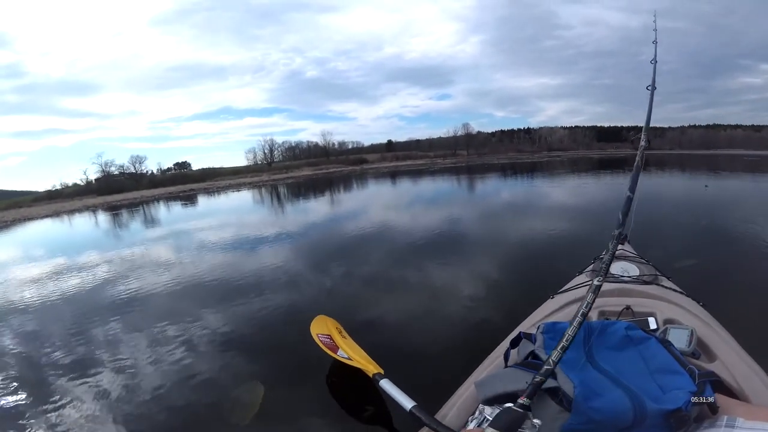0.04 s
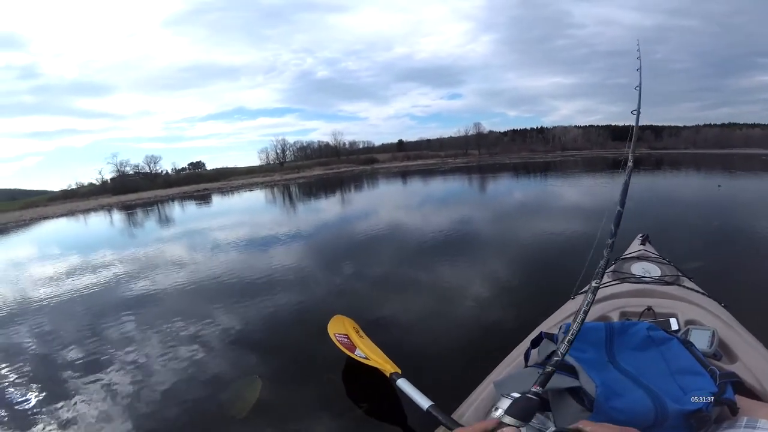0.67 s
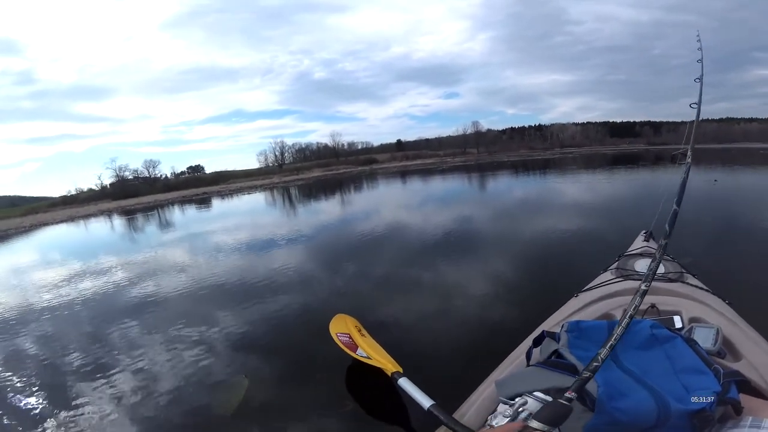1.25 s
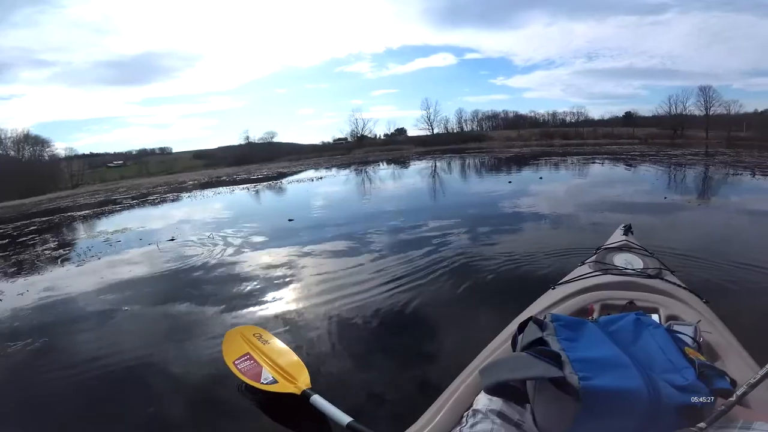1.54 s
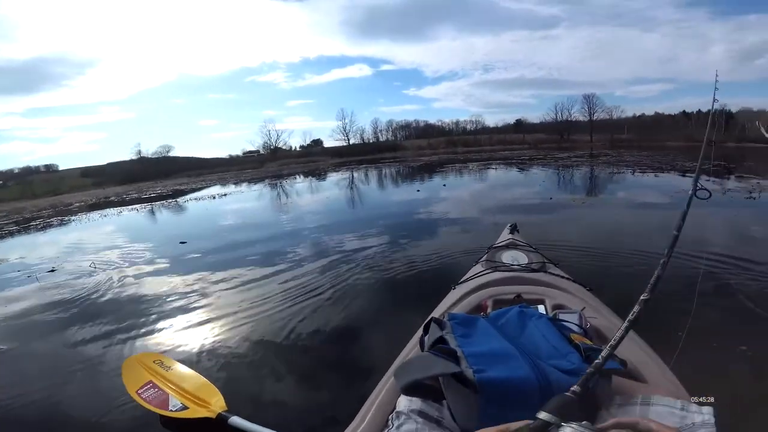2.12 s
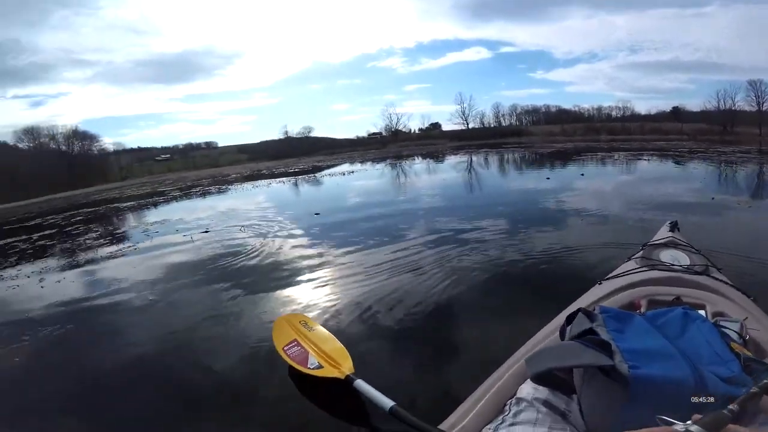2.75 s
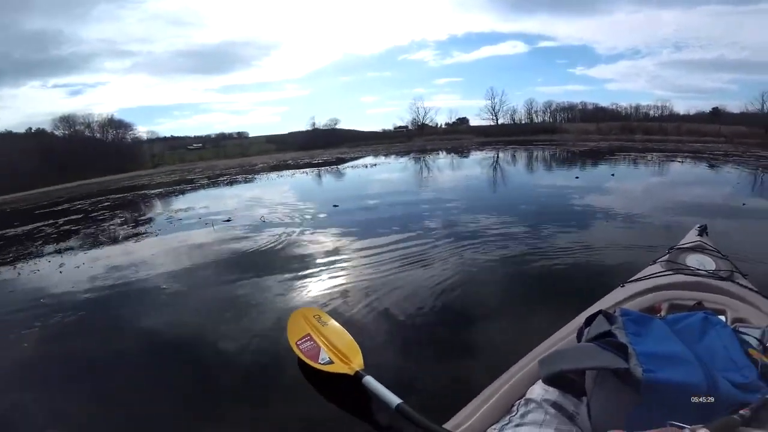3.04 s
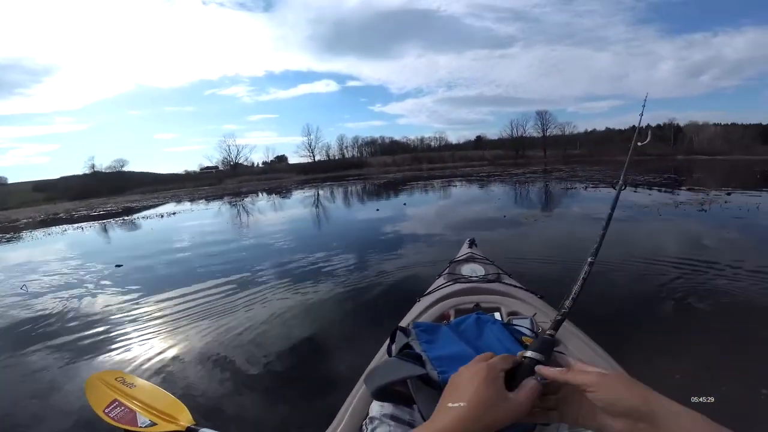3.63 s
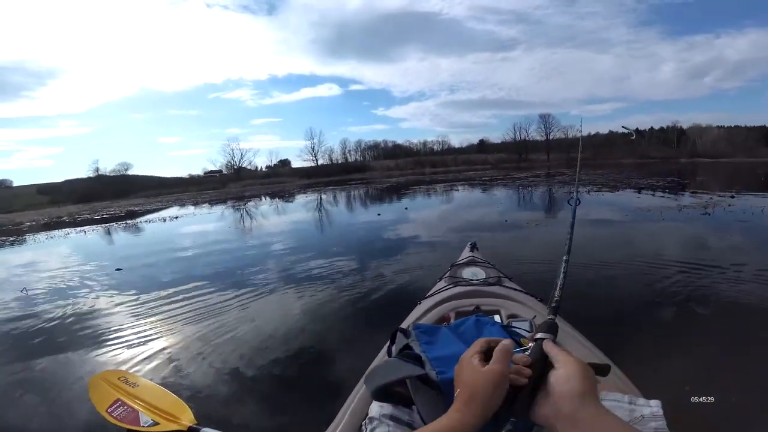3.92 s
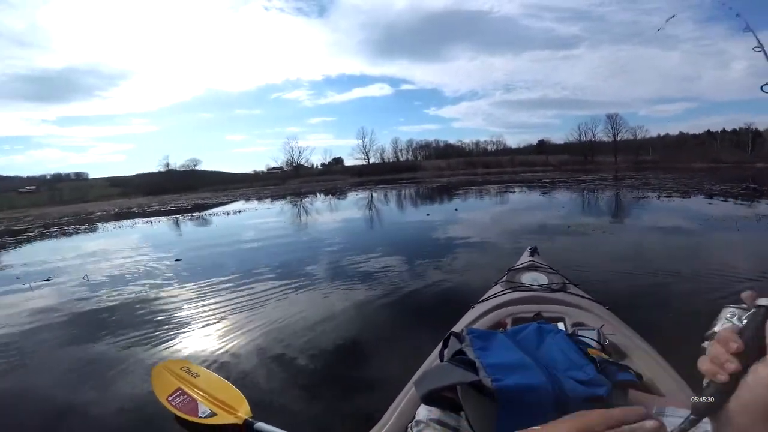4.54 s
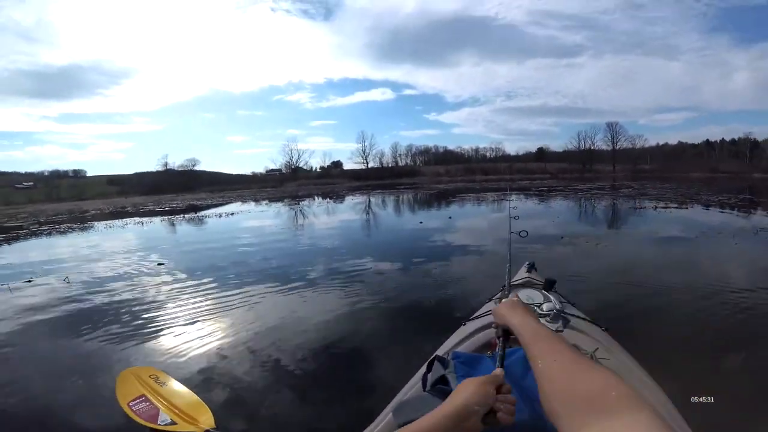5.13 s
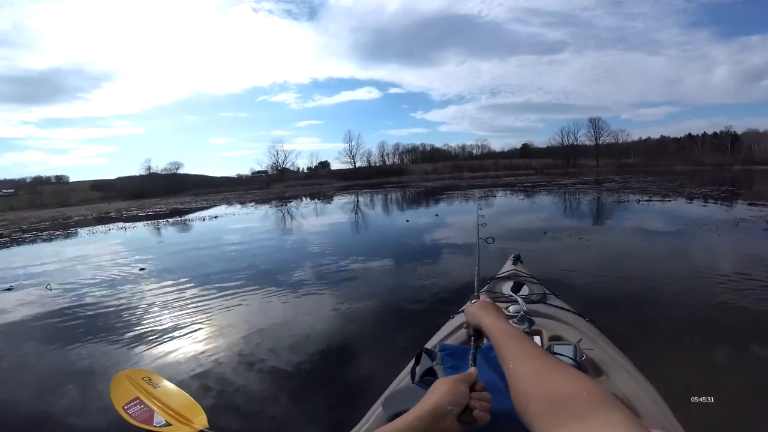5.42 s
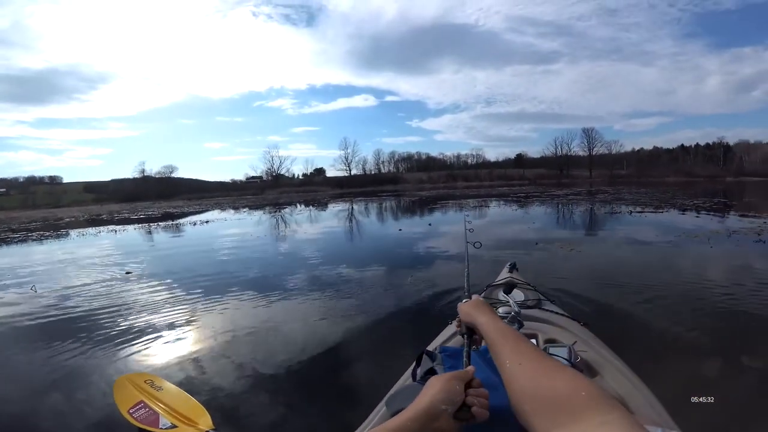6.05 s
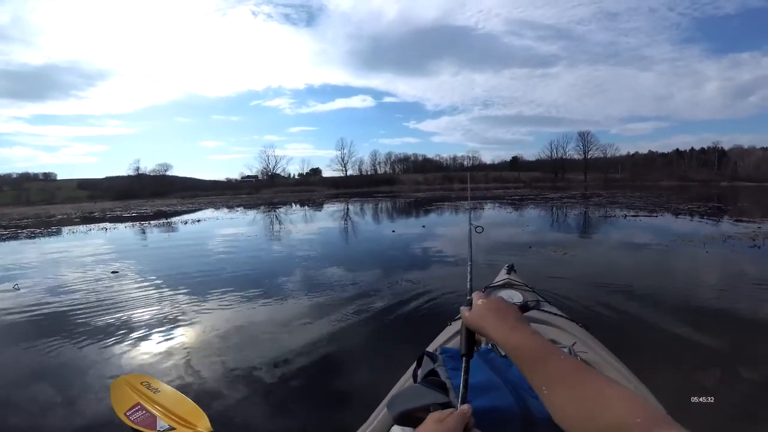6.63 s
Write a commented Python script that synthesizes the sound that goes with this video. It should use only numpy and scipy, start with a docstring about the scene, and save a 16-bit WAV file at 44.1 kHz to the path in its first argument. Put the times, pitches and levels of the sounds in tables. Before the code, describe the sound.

A shrill outdoor frog chorus continues behind nearby fishing reel clicks and the swish of a cast, which brings one loud, sharp knock.

```python
"""Spring peepers call from the shore of a still pond, each peep a short rising whistle, with birds far off.
Heard in stereo from a drifting kayak, on a camera worn by an angler. At arm's length a reel ratchets,
its bail snaps open, the rod swishes and line hisses off the spool; the cast brings one hard knock.
Right at the microphones are cloth rubbing on the housing, moving air, hiss and a faint pulsing whine."""
import sys
import numpy as np
from scipy import signal
from scipy.fft import rfft, irfft
from scipy.io import wavfile

SR = 44100
rng = np.random.default_rng(int(sys.argv[2]) if len(sys.argv) > 2 else 0)


def wav_record(signal):
    """Record a signal, one row per channel, as 16-bit PCM in the file named by sys.argv[1]."""
    frames = np.transpose(np.atleast_2d(signal))
    bounded = np.clip(frames, -1, 1)
    # unit amplitude maps onto the largest positive 16-bit level
    quanta = np.round(bounded * 32767).astype(np.int16)
    wavfile.write(sys.argv[1], SR, quanta)


N = 303408
TIME = np.arange(N) / SR

# The nearest frogs. Each name: start pitch in Hz, rise in Hz, length in seconds, left over right in dB.
FROG_VOICES = {"lead": (2805, 315, .115, 0), "quick": (2760, 195, .08, -3), "left": (2765, 315, .115, 8),
               "right": (2680, 250, .115, -8), "low": (2560, 185, .095, -8), "deep": (2425, 270, .13, -7),
               "shrill": (2930, 250, .08, 1), "high": (3070, 270, .08, 1), "far": (2450, 185, .085, 4)}
# Their clearest peeps. Each row: start in seconds, frog, relative level in dB.
NEAR_PEEPS = [(.005, "shrill", -62.5), (.035, "low", -63.5), (.08, "far", -66), (.14, "low", -61),
              (.286, "far", -57), (.585, "lead", -59), (.615, "far", -57.5), (.635, "low", -58),
              (1.04, "far", -61), (1.06, "lead", -62), (1.58, "low", -51.5), (1.745, "quick", -50.5),
              (1.749, "shrill", -49.5), (1.92, "right", -53), (1.924, "left", -56), (2.17, "left", -58),
              (2.316, "lead", -51), (2.331, "shrill", -54), (2.365, "deep", -53), (2.491, "right", -51),
              (2.598, "left", -57.5), (2.773, "lead", -48), (2.78, "shrill", -47.5), (2.905, "lead", -50.5),
              (3.055, "right", -57), (3.125, "lead", -51.5), (3.146, "deep", -54), (3.275, "shrill", -53),
              (3.42, "shrill", -53), (3.512, "lead", -55.5), (3.676, "right", -55), (3.87, "deep", -53.5),
              (3.912, "right", -59), (4.122, "shrill", -50), (4.255, "right", -51), (4.598, "lead", -49),
              (4.77, "right", -52), (5.009, "low", -51.5), (5.108, "lead", -49), (5.415, "lead", -46.5),
              (5.575, "right", -50), (5.72, "deep", -54.5), (5.845, "shrill", -51.5), (5.95, "lead", -46),
              (6.114, "right", -49), (6.12, "low", -47), (6.168, "quick", -46), (6.335, "low", -51),
              (6.355, "deep", -58.5), (6.463, "lead", -44.5), (6.469, "low", -48.5), (6.796, "low", -49),
              (6.815, "quick", -45)]
# Frogs that keep a beat. Each row: first peep and period in seconds, frog, relative level in dB.
STEADY_CALLERS = [(1.655, .49, "high", -60), (2.11, .496, "low", -54)]
# Rival frogs' trills. Each row: start and length in seconds, start and end pitch in Hz, level in dB.
RIVAL_TRILLS = [(0.423, 0.12, 2500, 2610, -64.5), (0.688, 0.21, 2970, 3130, -62.5),
                (0.984, 0.2, 3010, 3130, -66), (1.1, 0.4, 2470, 2600, -63)]
# Frogs further along the shore; the level jumps up at 1.5 s. Each row: time in seconds, level in dB.
CHORUS_LEVEL = [(0, -67), (.6, -66), (.95, -69.5), (1.25, -65), (1.493, -69), (1.5, -53), (1.95, -55),
                (2.6, -53.5), (3.45, -53), (4.05, -54.5), (4.35, -52.5), (5.4, -53.5), (5.65, -52.5),
                (5.95, -56.5), (6.2, -54.5), (6.88, -54.5)]
# Distant birds. Each row: start and length in seconds, pitch and arch height in Hz, level in dB.
BIRD_NOTES = [(.1, .07, 2000, 10, -71), (0.212, 0.066, 3380, 21, -68.5), (.3, 0.08, 2130, 9.2, -69.5),
              (3.006, 0.1, 3340, 160, -57.5), (3.725, 0.075, 2030, 40, -62), (3.84, 0.12, 3420, 31, -63),
              (3.942, 0.067, 2000, 82, -63)]

# Metal contacts in the reel. Each row: start in seconds, relative level in dB.
RATCHET_CLICKS = [(1.5025, -35), (1.5115, -37), (1.5205, -38), (1.5285, -36.5), (1.538, -37.5),
                  (1.5465, -35), (1.5595, -37), (1.5695, -38), (1.5803, -38.5), (1.5933, -36),
                  (1.614, -36.5), (1.637, -37), (1.6645, -39.5), (1.7038, -38)]  # slowing down
BAIL_CLICKS = [(2.5, -52.5), (3.15, -51), (3.435, -48), (4.2573, -47), (4.2627, -26.5), (4.2645, -34),
               (4.268, -34), (4.2705, -35), (4.273, -34), (4.648, -44)]  # small ticks and the snap
# Blows carried to the camera housing. Each row: start in seconds, strength in dB, contact in seconds.
HOUSING_BLOWS = [(3.048, -20.5, 0.0032), (3.138, -43.5, 0.0006), (4.357, -42, 0.0014), (4.855, 0, 0.00078),
                 (4.894, -29, 0.00058), (5.018, -39, 0.00052), (6.694, -54, 0.00087)]
# Resonances. Each row: pitch in Hz, relative level in dB, seconds to fall 60 dB, left over right in dB.
SPOOL_MODES = [(3670, -13, 0.021, -11), (3860, -9, 0.01, -12), (4340, -21.5, 0.35, -20),
               (4810, -13, 0.031, 1), (5240, -7, 0.0085, -7), (6293, -27.5, 0.11, -2),
               (7500, -21.5, 0.031, -7), (9800, -26, 0.048, 3), (11760, -18, .012, -2),
               (14400, -11, .012, -2)]  # ratchet wheel and spool
BAIL_MODES = [(2250, -20, .016, 0), (2700, -14, .018, 0), (3580, -11, .012, -4), (3930, -9, .011, -5),
              (4330, -10, .018, -6), (5200, -18, .008, -3), (7300, -19, .007, -1), (11750, -14, .008, -2),
              (14100, -14, .007, -2)]  # damped by the hand
HOUSING_MODES = [(208, 14.4, .014, 1), (527, 10.5, .0198, 0), (903, 9.3, .0185, 3), (1081, 4.8, .0092, -3),
                 (1420, -7, .022, .5), (1930, -16, .022, 2), (2130, -11, .026, 2), (2750, -12, .014, 0)]

# Close moves. Each row: peak time in seconds, level in dB, then attack, hold and release in seconds.
ROD_SWINGS = [(4.93, -55, .42, 0.081, 0.28), (4.885, -42.5, .08, 0.019, .045)]  # a broad sweep with a whip at its fastest
LINE_PAYOUT = [(4.906, -43.5, .055, .003, 0.046), (4.91, -57.5, .25, .15, 0.53)]  # a burst, then a slow run
CLOTH_RUBS = [(.8, -73.5, .15, 0.81, .04), (1.8, -66.5, .3, 0, 0.27), (2.55, -73, .8, 0.089, .8),
              (3.0, -59.5, 0.057, .015, .08), (3.125, -50.5, .15, 0.016, 0.051),
              (3.8, -71.5, .2, .52, 0.11), (4.745, -57.5, .06, .08, .1), (4.868, -44, 0.055, 0.064, 0.059),
              (5.015, -52.5, 0.055, 0.0056, .14)]  # strap and clothing, as the body moves
ARM_GUSTS = [(2.3, -75, .4, 2.1, .5), (4.865, -56.5, .25, .05, 0.12), (5.0, -67, .05, 0, .9)]  # air stirred by the arms
# A soft low rush early on. Each row: time in seconds, level in dB.
RUSH_LEVEL = [(0, -71.5), (.35, -72), (.55, -75), (.75, -68), (1.48, -69.5), (1.51, -101)]

# Noise colours. Each row: frequency in Hz, relative spectral density in dB.
WASH_COLOUR = [(900, -9.5), (1500, -7), (2100, -7), (2400, 0), (2800, -2), (3150, -2), (3450, -5.5),
               (4600, -13.5), (6500, -14.5)]  # the blur of the whole shore
SWISH_COLOUR = [(1500, -9), (2100, 1.5), (3000, 3.5), (4200, -5.5), (5800, -6.5), (7500, -25)]
LINE_COLOUR = [(4000, 3), (8000, -23.5), (10500, -14), (12000, 0), (15000, 0.5)]
CLOTH_COLOUR = [(53, -34.5), (90, -21), (173, -12), (405, -6.5), (477, 1.5), (546, -0.5), (688, -4),
                (902, 3), (1280, -7), (1450, -1.5), (1710, -23.5), (1850, -8.5), (2300, -11), (2990, -43.5),
                (5060, -120)]
BREEZE_COLOUR = [(20, -2), (30, -4), (50, 1), (80, -19), (140, -30.5)]
LOW_RUSH_COLOUR = [(70, -7), (170, -4.5), (400, -4), (900, -7.5), (1300, -40.5)]
HISS_COLOUR = [(90, -4), (300, 0), (560, 0), (700, -2), (900, 3), (1150, -3), (1480, 0), (1850, -4),
               (3700, -5), (4700, -3.5), (5500, -3.5), (8700, -3.5), (9800, -1), (10800, -2), (15000, 0)]  # carries the housing's resonances
WHINE_COLOUR = [(4300, -14.5), (4700, -1), (5100, -22), (9200, -22), (9800, -6), (10400, -22), (11200, -16),
                (11700, -3.5), (11950, -1.5), (12400, -2.5), (12800, -23.5), (14200, -8), (15000, -20)]
# How alike the two microphones hear noise. Each row: frequency in Hz, left-right correlation.
MIC_CORRELATION = [(60, .93), (300, 0.32), (1400, 0.43), (2600, 0.45), (8000, 0.028), (15000, 0.12)]


def peep(length, start_hz, end_hz, pan_db, flutter):
    """One frog's pure whistle swells and fades as it rises, reaching each microphone at its own phase."""
    progress = np.linspace(0, 1, max(int(length * SR), 2))
    phase = 2 * np.pi * np.cumsum(start_hz + (end_hz - start_hz) * progress) / SR
    phase += rng.uniform(0, 2 * np.pi)
    edges = np.minimum(1, 10 * np.minimum(progress, 1 - progress))
    swell = np.sqrt(np.abs(np.sin(np.pi * progress))) * edges
    waver = 1 + flutter * np.interp(progress, np.linspace(0, 1, 20), rng.standard_normal(20))
    mic_phase = rng.uniform(-1.12, 1.5) * np.array([[1], [-1]])
    return panned(pan_db) * np.sqrt(2) * swell * waver * np.sin(phase + mic_phase)


def near_frogs(trim_db=-2.13, pitch_scatter=.003, trill_per_s=23.9, echo_db=-14):
    """Peeps and stuttering trills from the near shore; a frog repeats nearly the same peep every time."""
    out = np.zeros((2, N))
    beats = [(first + period * k, frog, db)
             for first, period, frog, db in STEADY_CALLERS for k in range(int(N / SR / period))]
    for start, frog, db in NEAR_PEEPS + beats:
        start_hz, rise_hz, length, pan_db = FROG_VOICES[frog]
        hz = start_hz * (1 + pitch_scatter * rng.standard_normal())
        add(out, start, from_db(db + trim_db) * peep(length, hz, hz + rise_hz, pan_db, flutter=.15))
    for start, length, start_hz, end_hz, db in RIVAL_TRILLS:
        call = peep(length, start_hz, end_hz, 0, flutter=.38)
        stutter = np.sin(np.pi * trill_per_s * TIME[:call.shape[1]]) ** 2
        add(out, start, from_db(db) * call * stutter)
    return out + from_db(echo_db) * shore_echo(out)


def far_frogs(peeps_per_s=75, centre_hz=2784, spread_hz=247, rise_hz=257, echo_db=-5, wash_db=-11):
    """Along the shore, overlapping peeps merge into a shimmering band; deeper frogs sit to the right."""
    out = np.zeros((2, N))
    for start in np.arange(-.2, N / SR, 1 / peeps_per_s):
        late, high, loud, side, long = rng.standard_normal(5)
        hz = centre_hz + spread_hz * np.tanh(high) - 89.9 * (start < 1.37)  # early peeps are deeper
        length = .105 * np.exp(.1914 * long)
        call = peep(length, hz - rise_hz / 2, hz + rise_hz / 2, pan_db=4 * side + 2 * high, flutter=.33)
        add(out, start + .02 * late, from_db(3 * loud) * call)
    calls = rms_one(out + from_db(echo_db) * shore_echo(out))
    wash = from_db(wash_db) * stereo_noise(WASH_COLOUR)
    return level_curve(CHORUS_LEVEL) * panned(-.3) * rms_one(calls + wash)


def shore_echo(calls, t60=.35):
    """Reeds and trees on the bank scatter the calls into a short diffuse tail."""
    t = TIME[:SR]
    tail = rng.standard_normal((2, SR)) * from_db(-60 * t / t60) * (t > .01)
    tail /= np.sqrt(np.sum(tail ** 2, axis=1, keepdims=True))
    return signal.fftconvolve(calls, tail, axes=1)[:, :N]


def reel(clicks, modes, trim_db, crack_db, crack_t60, min_bounce_s, bounce_db):
    """At arm's length, each metal contact bounces once; both touches ring the part with a bright crack."""
    out, t = np.zeros((2, N)), TIME[:SR // 4]
    bright = signal.butter(2, [3200, 16000], "band", fs=SR, output="sos")
    bass_cut = signal.butter(2, 1500, "high", fs=SR, output="sos")  # so small a body radiates no bass
    for start, db in clicks:
        for delay, touch_db in ((0, 0), (min_bounce_s, bounce_db)):
            crack = signal.sosfilt(bright, rng.standard_normal((2, len(t))))
            crack *= from_db(crack_db - 60 * t / crack_t60)
            touch = ringing(modes, vary_db=4.5) + crack
            add(out, start + delay * rng.uniform(1, 1.6), from_db(db + trim_db + touch_db) * touch)
    return signal.sosfilt(bass_cut, out)


def cast(flutter_db=.5):
    """The rod swishes past the microphones and coils of line flick off the spool."""
    flutter = from_db(flutter_db * drift(150))
    swish = swells(ROD_SWINGS) * panned(-2.5) * stereo_noise(SWISH_COLOUR)
    line = swells(LINE_PAYOUT) * panned(-1) * stereo_noise(LINE_COLOUR)
    return flutter * (swish + line)


def housing_knocks(bass_cut_hz=1400):
    """A rounded push rings the camera housing, which passes little bass; longer contact sounds duller."""
    out, t = np.zeros((2, N)), TIME[:SR // 100]
    bass_cut = signal.butter(2, bass_cut_hz, "high", fs=SR, output="sos")
    body = signal.sosfilt(bass_cut, ringing(HOUSING_MODES, vary_db=0))
    for start, db, contact in HOUSING_BLOWS:
        push = np.sin(np.pi * np.minimum(t / contact, 1)) ** 2
        add(out, start, from_db(db) * signal.fftconvolve(body, [push / push.sum()], axes=1))
    return out


def cloth_rubbing(slips_per_s=600, rest_db=-83.5):
    """Tiny slips of cloth on the plastic housing reach both microphones together."""
    slips = (rng.random(N) < slips_per_s / SR) * rng.standard_normal(N)
    sliding = .083 * rng.standard_normal(N)
    level = np.hypot(swells(CLOTH_RUBS), from_db(rest_db))
    return level * panned(1) * coloured(slips + sliding, CLOTH_COLOUR)


def distant_birds(flutter=.65):
    """Thin arched whistles, pitched above and below the frogs, waver with distance."""
    out = np.zeros((2, N))
    for start, length, hz, arch_hz, db in BIRD_NOTES:
        arch = np.sin(np.linspace(0, np.pi, int(length * SR)))
        phase = 2 * np.pi * np.cumsum(hz + arch_hz * arch) / SR
        add(out, start, from_db(db) * arch * np.sin(phase))
    return out * (1 + flutter * drift(200))


def air(breeze_db=-77.5, wander_db=2):
    """A light breeze and gusts from the arms rumble on the microphones, with a soft low rush early on."""
    breeze = from_db(breeze_db + wander_db * drift(9))
    rumble = np.hypot(breeze, swells(ARM_GUSTS)) * stereo_noise(BREEZE_COLOUR)
    return rumble + level_curve(RUSH_LEVEL) * stereo_noise(LOW_RUSH_COLOUR)


def camera_noise(hiss_db=-62, whine_db=-69.5, frames_per_s=23.5):
    """The camera's electronics hiss steadily and whine once for every picture it takes."""
    pulses = (TIME * frames_per_s) % 1 < .5
    whine = from_db(whine_db) * rms_one(pulses * stereo_noise(WHINE_COLOUR))
    hiss = from_db(hiss_db) * stereo_noise(HISS_COLOUR)
    return panned(-1.2) * (hiss + whine)


def ringing(modes, vary_db):
    """A body's stereo answer to one blow: decaying sines, their strengths scattered by vary_db."""
    out, t = np.zeros((2, SR // 4)), TIME[:SR // 4]
    for hz, db, t60, pan_db in modes:
        decay = from_db(db + vary_db * rng.standard_normal() - 60 * t / t60)
        out += panned(pan_db) * decay * np.sin(2 * np.pi * hz * t)
    return out


def stereo_noise(spectrum):
    """Noise that both microphones share in the bass and less in the treble."""
    hz = np.arange(N // 2 + 1) * SR / N
    alike = np.interp(hz, *np.transpose(MIC_CORRELATION))
    mid, side = rfft(rng.standard_normal((2, N)))
    pair = np.sqrt(1 + alike) * mid + np.sqrt(1 - alike) * side * [[1], [-1]]
    return coloured(irfft(pair, N), spectrum)


def coloured(x, spectrum):
    """Give a signal a spectrum that falls steeply beyond its ends; rms one."""
    hz = np.maximum(np.arange(N // 2 + 1) * SR / N, 1)
    points, db = np.transpose(spectrum)
    shape = from_db(np.interp(np.log(hz), np.log(points), db))
    low_cut = 1 + (points[0] / hz / np.sqrt(2)) ** 8
    high_cut = 1 + (hz / points[-1] / 2 ** .25) ** 16
    return rms_one(irfft(rfft(x) * shape / np.sqrt(low_cut * high_cut), N))


def swells(rows):
    """Envelope of moves that rise, hold and fall; attack and release are the times for 20 dB."""
    power = 0
    for peak, db, attack, hold, release in rows:
        away = np.maximum(peak - TIME, 0) / attack + np.maximum(TIME - peak - hold, 0) / release
        power += from_db(db - 20 * np.minimum(away, 10)) ** 2
    return np.sqrt(power)


def level_curve(rows):
    """Rows of seconds and dB as a gain at every sample."""
    return from_db(np.interp(TIME, *np.transpose(rows)))


def drift(turns_per_s):
    """A random wander of rms one."""
    knots = rng.standard_normal(int(N / SR * turns_per_s) + 2)
    return rms_one(np.interp(TIME * turns_per_s, np.arange(len(knots)), knots))


def panned(db):
    """Left and right gains at constant power; positive dB leans left."""
    return rms_one(from_db([[db / 2], [-db / 2]]))


def add(out, start, sound):
    """Mix a sound in at a start in seconds, trimmed to the scene."""
    at = int(start * SR)
    first, last = max(at, 0), min(at + sound.shape[-1], N)
    if last > first:
        out[..., first:last] += sound[..., first - at:last - at]


def from_db(db):
    """Decibels to gain."""
    return 10 ** (np.asarray(db) / 20)


def rms_one(x):
    """Scale to an rms of one."""
    return x / np.sqrt(np.mean(x ** 2) + 1e-20)


def scene():
    """From the kayak seat: the shore across the water, the tackle close by, the camera on the body."""
    ratchet = reel(RATCHET_CLICKS, SPOOL_MODES, trim_db=-2, crack_db=-2, crack_t60=.011,
                   min_bounce_s=.0012, bounce_db=-3.5)
    bail = reel(BAIL_CLICKS, BAIL_MODES, trim_db=-1.5, crack_db=-9, crack_t60=.014,
                min_bounce_s=.000876, bounce_db=-5)
    shore = near_frogs() + far_frogs() + distant_birds()
    close_by = ratchet + bail + housing_knocks() + cloth_rubbing() + cast()
    return shore + close_by + air() + camera_noise()


def record(dry):
    """The camera limits peaks to full scale and cuts the treble above 15.6 kHz."""
    treble_cut = signal.ellip(10, .1, 80, 15600, fs=SR, output="sos")
    return signal.sosfilt(treble_cut, np.clip(dry, -1, 1))


dry = scene()
out = record(dry)
wav_record(out)
```